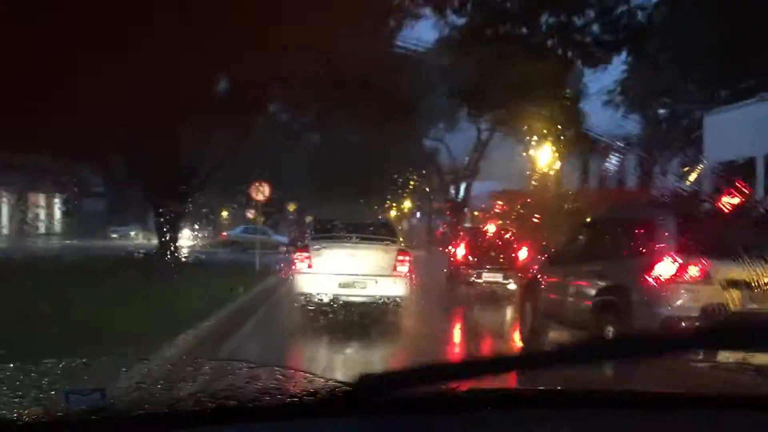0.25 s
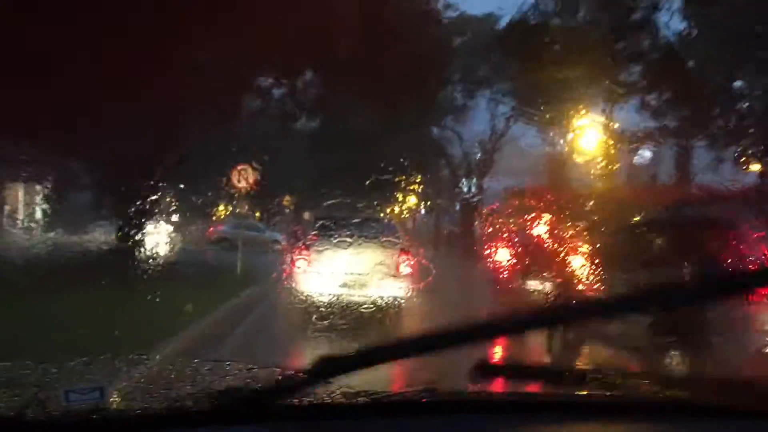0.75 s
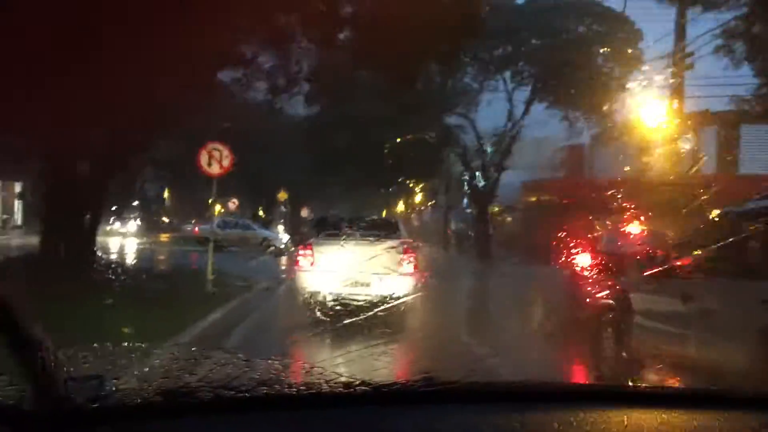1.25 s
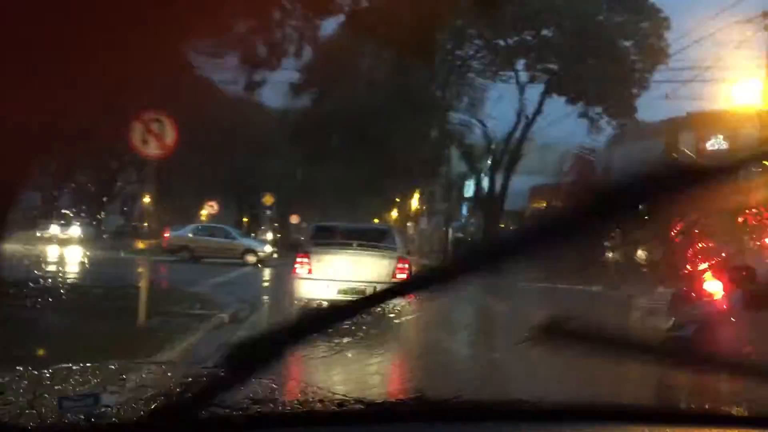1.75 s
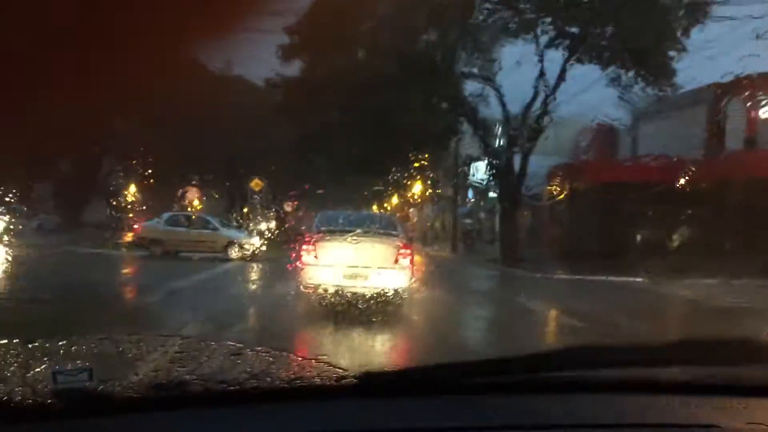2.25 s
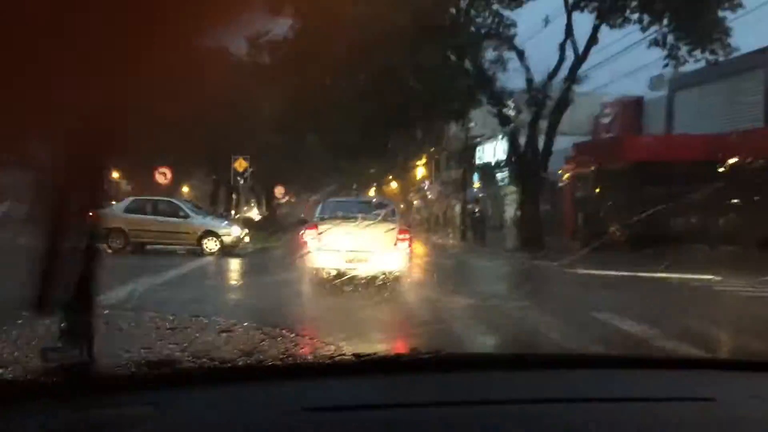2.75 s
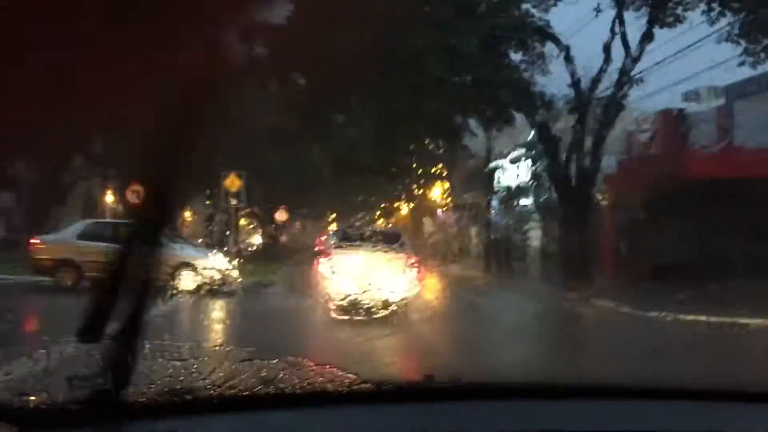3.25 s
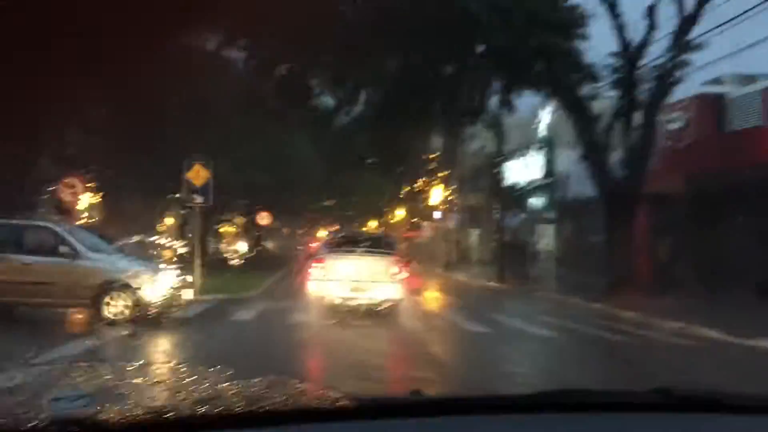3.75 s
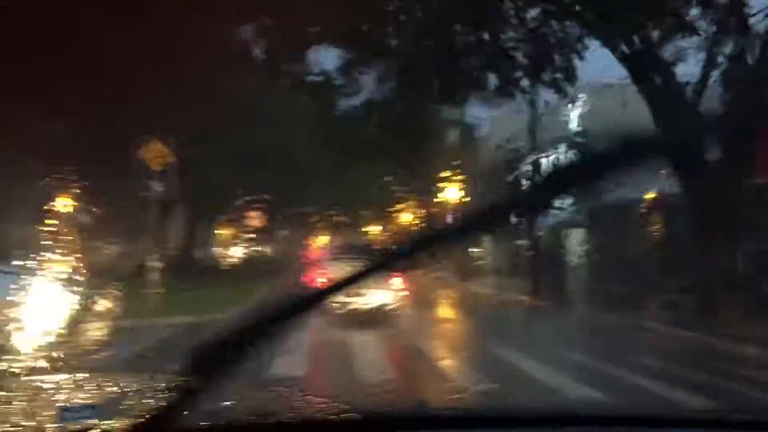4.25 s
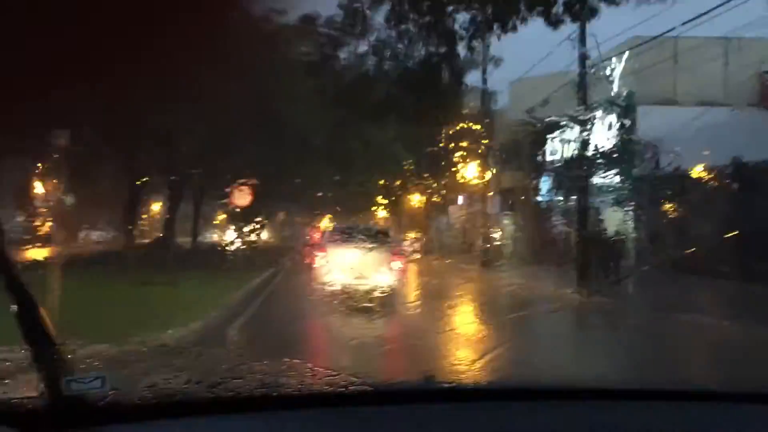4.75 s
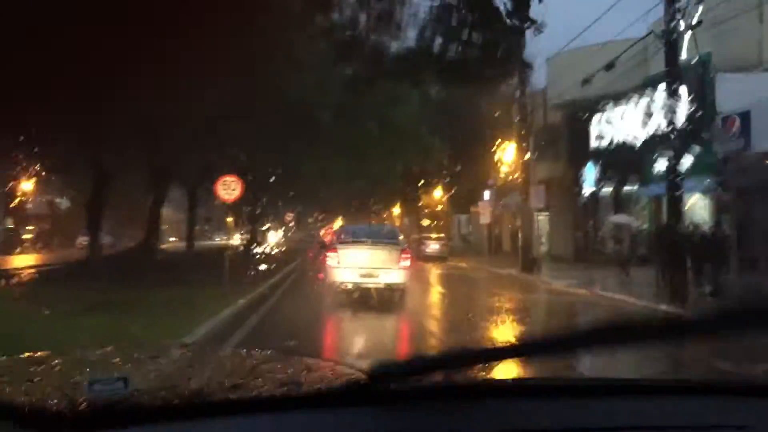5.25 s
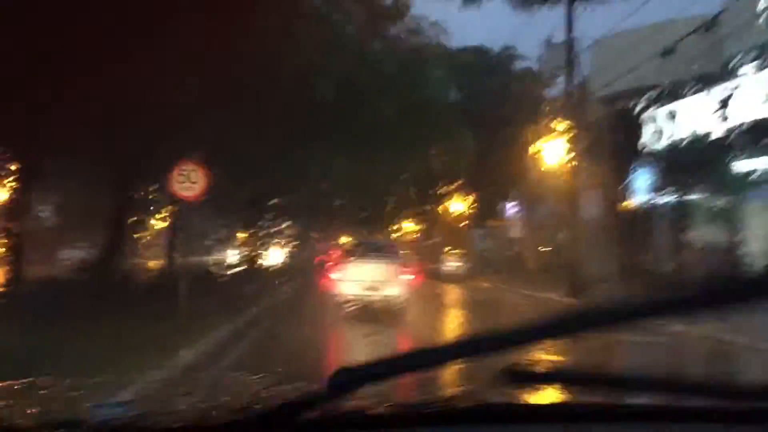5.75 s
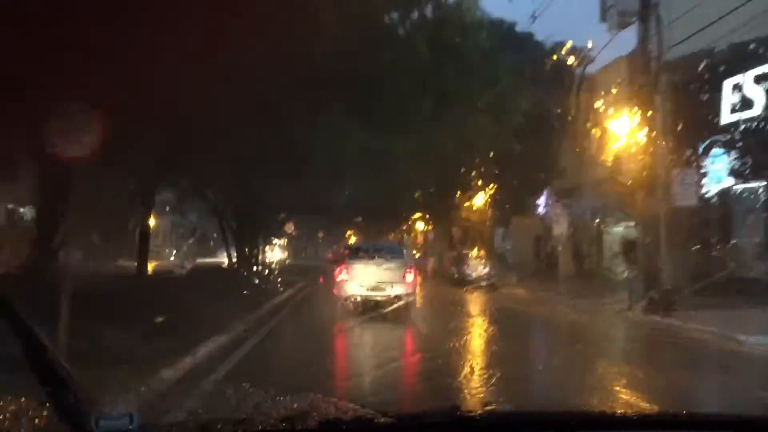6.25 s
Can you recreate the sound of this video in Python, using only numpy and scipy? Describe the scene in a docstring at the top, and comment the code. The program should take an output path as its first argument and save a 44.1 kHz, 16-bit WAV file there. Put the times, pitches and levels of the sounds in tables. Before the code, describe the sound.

Dense rain patter runs throughout, bright crackling on glass over a duller, slightly metallic roof drumming. A low uneven engine and road rumble fills the closed cabin. From just after half a second, wipers repeat about every 1.7 seconds: wet swish, raspy chattering rubber, low double thud. Fine spray and wet tyres add soft hiss, heard from a phone inside the car.

```python
"""Heavy rain heard from inside a slowly rolling car.
From the start drops tick on the windshield and drum on the lined roof: noise bursts through resonances.
Fine spray hisses, tyres hiss in standing water, and road noise and an engine tone boom in the cabin.
Soon the wipers join in, four times over: a wet swish, a juddering stroke of swinging rubber
that snags and rasps, then knocks as the blades flip over."""
import sys
import numpy as np
from scipy import signal
from scipy.fft import rfft, irfft
from scipy.io import wavfile

SR = 44100
rng = np.random.default_rng(int(sys.argv[2]) if len(sys.argv) > 2 else 0)


def file_out(sig):
    """Save sig as 16-bit WAV at sys.argv[1]."""
    # one column per channel
    cols = np.atleast_2d(sig).T
    # limit, then scale
    lim = np.clip(cols, -1, 1)
    pcm = np.round(lim * 32767).astype(np.int16)
    wavfile.write(sys.argv[1], SR, pcm)


N = 287091
T = np.arange(N) / SR

# strength of the shower before its brief lulls: [t/s, patter on the glass/dB, drumming on the roof/dB]
SHOWER = [(0, -50.5, -39.5), (0.3, -50, -42.5), (0.48, -53, -52.5), (0.6, -49, -41.5), (0.75, -60.5, -49.5),
          (1.05, -50, -40.5), (1.24, -66, -53), (1.35, -50.5, -36), (1.5, -56, -47.5), (1.75, -58, -40),
          (1.97, -53, -42.5), (2.2, -46.5, -39), (2.35, -58, -46.5), (2.45, -52.5, -48), (2.72, -53.5, -46),
          (2.87, -50, -45), (3.0, -57, -41.5), (3.14, -48.5, -51), (3.28, -66, -42), (3.39, -57, -46),
          (3.56, -51, -38), (3.7, -47.5, -43.5), (3.92, -64, -44.5), (4.3, -57.5, -47), (4.6, -51, -48),
          (4.92, -64, -52), (5.0, -45, -39.5), (5.1, -49.5, -44), (5.33, -47.5, -34.5), (5.42, -47.5, -40),
          (5.62, -49, -38), (5.95, -49, -51.5), (6.07, -55, -46), (6.2, -55, -41.5), (6.5, -52, -39)]
# dull answer of the pane to drops and wet slaps: [f/Hz, level/dB]
PANE_COLOUR = [(150, -3.5), (350, 5.5), (550, -4.5), (800, -8), (1300, -10), (2000, -10.5), (2600, -25.5),
               (5000, -39), (12000, -32)]
# low growl, shared by scraping rubber and the boom of the cabin: [f/Hz, level/dB]
GROWL_COLOUR = [(30, -37.5), (70, 1.5), (110, -4), (170, 1), (230, -2.5), (310, -3), (380, -23), (650, -29),
                (1400, -43), (5000, -64)]


def undb(db):
    """Decibels to gain."""
    return 10 ** (np.asarray(db) / 20)


def unit(x):
    """Scale to rms 1."""
    return x / np.sqrt(np.mean(x ** 2) + 1e-18)


def curve(rows, column=1):
    """One column of a table, joined by straight lines in time."""
    rows = np.array(rows)
    return np.interp(T, rows[:, 0], rows[:, column])


def add(track, s, sound):
    """Mix a sound into the track at time s."""
    i = int(np.clip(s * SR, 0, N - 1))
    track[i:i + len(sound)] += sound[:N - i]


def response(points, size=4096):
    """Causal (minimum-phase) impulse response of unit energy with the given colour."""
    hz, db = np.transpose(points)
    f = np.maximum(np.fft.rfftfreq(size, 1 / SR), 1)
    gain = undb(np.interp(np.log(f), np.log(hz), db))
    # folding the cepstrum onto positive times makes the response causal
    cepstrum = irfft(np.log(gain))
    cepstrum[1:size // 2] *= 2
    cepstrum[size // 2 + 1:] = 0
    h = irfft(np.exp(rfft(cepstrum)))
    return h / np.linalg.norm(h)


def colour(x, points):
    """Pass a sound through a body with the given colour."""
    return signal.oaconvolve(x, response(points))[:N]


def ring(x, modes):
    """Sum of resonances (Hz, width Hz, dB)."""
    out = 0
    for hz, width, db in modes:
        b, a = signal.iirpeak(hz, hz / width, fs=SR)
        out = out + undb(db) * signal.lfilter(b, a, x)
    return out


def walk(rate):
    """Slow random drift within -2 to 2, with rate knots per second and a spread near 1."""
    knots = 2 * np.tanh(rng.standard_normal(N))
    return np.interp(T * rate, np.arange(N), knots)


def splash(decay_s, grain_db=3, spot_db=2, size=5000):
    """A burst of scattering droplets, coloured by the spot it hits; rms 1 if packed into 10 ms."""
    t = T[:size]
    grain = np.interp(t * 900, np.arange(size), rng.standard_normal(size))
    droplets = undb(grain_db * grain)
    burst = rng.standard_normal(size) * droplets * np.exp(-t / decay_s)
    spot_hz = 700 * 10 ** rng.random(3)
    burst = burst + ring(burst, [(hz, hz / 5, spot_db) for hz in spot_hz])
    return burst * np.sqrt(SR / 100) / np.linalg.norm(burst)


def patter(rate, spread_db, crack_s, tail_s, tail_db, count=16):
    """Drops of all sizes fall at random on several spots, each spot with its own splash; rms 1."""
    out = 0
    for _ in range(count):
        falls = np.zeros(N)
        when, size = rng.random((int(rate * T[-1] / count), 2)).T
        falls[(when * N).astype(int)] = undb(-spread_db * size)
        drop = splash(crack_s) + undb(tail_db) * splash(tail_s)
        out = out + signal.oaconvolve(falls, drop)[:N]
    return unit(out)


def brighten(x, db):
    """Lift or dull the top against the rest by the given dB, with part of the change balanced out."""
    lowpass = signal.butter(2, 6600, fs=SR, output="sos")
    low = signal.sosfiltfilt(lowpass, x, padtype=None)
    return undb(-db / 4) * (low + undb(db) * (x - low))


def middling_drops():
    """Random drops, harder when the shower is strong: rows like those of the big drops."""
    per_s, spread_db = 18, 3
    when, size, spot, bright = rng.standard_normal((int(per_s * T[-1]), 4)).T
    s = np.clip((np.arange(len(when)) + .5 + .5 * when) / per_s, 0, T[-1])
    crack_db = np.interp(s, T, curve(SHOWER)) + spread_db * np.tanh(size)
    spatter_db = crack_db + 3
    pane_db = crack_db + spread_db * spot
    return list(zip(s, crack_db, spatter_db, pane_db, 2 * bright))


def windshield(lulls):
    """Drops crack on hard glass, scatter into spatter and draw a dull answer from the pane."""
    # biggest single drops, before brightening and colour:
    # [t/s, first crack level/dB, spatter level/dB, pane level/dB, top against the rest/dB]
    big_drops = [(0.0134, -42, -40, -35.5, -2), (0.0497, -46, -37, -35.5, -10), (0.0862, -48, -46, -55, 0),
                 (0.1009, -45, -39, -41, -2), (0.1398, -37.5, -50, -33.5, -8), (0.1447, -42, -39, -28, 3),
                 (0.2498, -42.5, -40, -41, 6), (0.3022, -47, -48, -38, 1), (0.3323, -42.5, -52, -47, -11),
                 (0.5898, -50, -47, -59, 5), (0.7657, -50, -45, -44, -4), (0.8049, -41.5, -42, -33, 3),
                 (0.903, -45, -39.5, -33.5, -10), (0.9168, -46, -42, -49, -1), (0.9294, -47, -46, -55, 8),
                 (1.0215, -45.5, -50, -54, 5), (1.0334, -50, -61, -51, 0), (1.0448, -46, -44, -36, -6),
                 (1.0547, -41, -51, -35.5, -1), (1.1134, -43, -43, -42, -7), (1.1182, -43, -54, -59, -2),
                 (1.1379, -43.5, -40, -42, -9), (1.152, -44, -40, -55, -3), (1.2217, -42, -44, -48, -14),
                 (1.2881, -39.5, -48, -35, -9), (1.341, -55, -48, -30.5, -6), (1.364, -41.5, -52, -31, -12),
                 (1.4275, -54, -46, -43, 0), (1.451, -45, -46, -54, -3), (1.4595, -38.5, -45, -40, -3),
                 (1.4927, -46, -57, -58, -12), (1.5272, -34.5, -36.5, -34, 0), (1.5466, -43, -47, -35, -6),
                 (1.6251, -40, -41, -37.5, -1), (1.6526, -40.5, -43, -35, -4), (1.7161, -48, -38, -53, -12),
                 (1.7232, -45, -39, -46, -6), (1.7875, -41.5, -39, -34, -20), (1.8188, -40, -34.5, -37, -3),
                 (1.8597, -45, -36, -30, -14), (1.8634, -42, -43, -39, -9), (1.8793, -49, -41, -39, 6),
                 (1.894, -48, -41, -33, -1), (1.942, -53, -47, -25, 2), (1.9719, -43.5, -47, -53, -15),
                 (1.9852, -50, -43, -37, -12), (1.9952, -52, -42, -45, -6), (2.0076, -43, -44, -53, -6),
                 (2.0288, -50, -43, -36, -10), (2.0554, -48, -44, -37, -7), (2.1124, -44.5, -48, -56, -1),
                 (2.1503, -44, -41, -28, -7), (2.2048, -49, -38, -53, 1), (2.5344, -54, -42, -45, 4),
                 (2.5759, -40.5, -44, -36.5, -5), (2.6508, -45, -42, -39, 1), (2.6595, -49, -48, -47, 0),
                 (2.715, -47, -39.5, -33, -4), (2.7493, -46, -44.5, -46, -3), (2.8192, -49, -44, -41, -2),
                 (2.8615, -46.5, -50, -40, 10), (2.9175, -45, -41, -37, -6), (2.956, -44, -45, -41, -16),
                 (2.9737, -52, -41, -37, -8), (3.065, -46.5, -51, -32, 4), (3.1816, -47, -44, -41, -6),
                 (3.1867, -49, -43, -40, -4), (3.1938, -39.5, -43.5, -50, -8), (3.1984, -40, -45, -45, 3),
                 (3.2324, -47, -42, -55, 6), (3.2707, -43, -46, -43, -10), (3.2828, -54, -42.5, -38, -14),
                 (3.3299, -40.5, -36.5, -35, -1), (3.3978, -42, -39, -54, -2), (3.4076, -40, -46, -52, -5),
                 (3.4254, -41.5, -38, -42, -2), (3.4615, -41, -43, -38, -4), (3.5001, -44, -41.5, -35, -5),
                 (3.5302, -48, -41, -33.5, -3), (3.5464, -46, -48, -56, -4), (3.6715, -45, -47, -35, -13),
                 (3.6837, -42.5, -44, -50, -5), (3.7502, -59, -44, -33, -2), (3.8538, -55, -43, -37, 5),
                 (3.9573, -54, -56, -31, -2), (4.0636, -49, -56, -52, 2), (4.1006, -49, -40.5, -31, 0),
                 (4.2248, -54, -50, -42, 4), (4.2368, -47.5, -59, -38, 5), (4.2604, -55, -63, -43, 0),
                 (4.2709, -55, -58, -62, 11), (4.3604, -50, -62, -63, 0), (4.4792, -51, -47, -60, 0),
                 (4.7476, -53, -43, -38, -6), (4.8276, -40, -41, -54, -5), (4.8948, -53, -46, -42, -6),
                 (4.9236, -50, -42, -54, -11), (4.9482, -49, -52, -59, 1), (4.9776, -47, -47, -29.5, -10),
                 (5.0013, -45, -38.5, -31.5, -4), (5.0288, -46.5, -42, -42, 5), (5.0499, -46, -47, -41, 0),
                 (5.0868, -41, -44, -32.5, -5), (5.0956, -44, -47, -44, -4), (5.1436, -52, -45, -39, 1),
                 (5.1789, -49, -44, -56, -5), (5.1939, -55, -45, -54, 6), (5.197, -39, -49, -54, 3),
                 (5.2211, -48, -47, -40, 4), (5.2444, -37.5, -33.5, -37, -1), (5.2776, -49, -44, -34.5, 6),
                 (5.3225, -52, -37.5, -52, 5), (5.3385, -41, -35, -30, 4), (5.348, -47, -37, -32, -2),
                 (5.3646, -49, -39, -33, -4), (5.3682, -51, -50, -48, -5), (5.3805, -47, -45, -33.5, 2),
                 (5.4009, -48, -42, -39, -4), (5.4116, -46, -47, -55, -5), (5.4579, -41, -55, -34, -7),
                 (5.4613, -38.5, -42, -33, -2), (5.4841, -43, -44, -36, -4), (5.5242, -51, -39, -56, 4),
                 (5.5799, -43, -58, -55, -4), (5.5867, -46, -37, -52, -3), (5.6238, -42, -50, -29.5, -10),
                 (5.6453, -43, -45, -35, -10), (5.6657, -47, -57, -44, -12), (5.6906, -45, -57, -30.5, -19),
                 (5.7424, -43, -41, -53, -3), (5.7641, -45, -38, -52, 0), (5.8143, -48, -47, -34, -3),
                 (5.8833, -46, -45, -56, 2), (5.8979, -39.5, -41, -51, -3), (5.9985, -42, -46, -33, 1),
                 (6.0487, -43.5, -44, -56, 10), (6.0852, -44.5, -43, -38.5, 7), (6.1, -39, -36.5, -33, 5),
                 (6.1398, -46, -41, -54, 6), (6.1734, -48, -46, -52, -9), (6.1871, -55, -37.5, -51, 0),
                 (6.213, -40.5, -35.5, -38, 2), (6.2491, -46, -43, -36, 0), (6.2689, -37, -36, -37, 1.5),
                 (6.2733, -45, -39, -43, 0), (6.2988, -37.5, -45, -51, -6), (6.3171, -43, -42, -36, -5),
                 (6.3973, -47, -41.5, -41, 4), (6.4749, -48, -41.5, -36, -1)]
    # first crack on the glass: [f/Hz, level/dB]
    crack_colour = [(400, -6), (1200, 1), (2200, 1.5), (3600, 1.5), (4900, -1.5), (5700, 1), (7500, -3.5),
                    (9500, -3.5), (10500, -11), (11500, -6.5), (15500, -9.5)]
    # ticking of spatter and small drops: [f/Hz, level/dB]
    tick_colour = [(400, 0), (1200, 2.5), (2200, 1.5), (3600, 4), (4900, -0.5), (5700, 1.5), (7500, -5),
                   (9500, -8), (10500, -14), (11500, -13.5), (15500, -18.5)]
    small = patter(rate=100, spread_db=18, crack_s=.0005, tail_s=.005, tail_db=-1)
    small = small * undb(curve(SHOWER)) * lulls
    cracks, spatter, pane = np.zeros((3, N))
    for s, crack_db, spatter_db, pane_db, bright_db in list(big_drops) + middling_drops():
        crack = brighten(splash(decay_s=0.00045, spot_db=-4), bright_db)
        add(cracks, s, undb(crack_db + 1.5) * crack)  # hard glass favours the crack
        droplets = brighten(splash(decay_s=0.0045, grain_db=4, spot_db=-3), bright_db)
        add(spatter, s + 0.0013, undb(spatter_db) * droplets)
        add(pane, s, undb(pane_db) * splash(decay_s=0.0065, grain_db=2, spot_db=-5))
    ticks = colour(cracks, crack_colour) + colour(spatter + small, tick_colour)
    return ticks + colour(pane + undb(-1) * small, PANE_COLOUR)


def roof(lulls):
    """Drops drum on ringing sheet steel, heavy splats ring their spot, and the lining takes off treble."""
    # heaviest splats, before the roof's colour: [t/s, level/dB, ring of the spot f/Hz]
    splats = [(0.038, -31, 1000), (0.111, -37, 940), (0.149, -35, 720), (0.247, -31.5, 1110),
              (0.273, -37, 1770), (0.415, -39, 1090), (0.545, -36, 1350), (1.309, -33, 1200),
              (1.345, -32, 1300), (1.858, -26, 1910), (1.924, -27.5, 1155), (1.984, -32.5, 1340),
              (2.044, -30.5, 1090), (2.132, -29.5, 1170), (2.25, -33.5, 1180), (2.348, -34, 1100),
              (2.917, -30, 1140), (2.975, -31.5, 1170), (3.016, -30.5, 1080), (3.045, -30, 1370),
              (3.503, -37.5, 950), (3.574, -31.5, 1220), (3.621, -37.5, 1290), (3.752, -34, 1110),
              (5.21, -33.5, 1410), (5.261, -29, 1100), (5.54, -43, 1240), (5.81, -35, 990),
              (5.91, -31.5, 970), (5.963, -31, 1180), (6.395, -40, 1310), (6.456, -32, 1070),
              (6.478, -31, 1350)]
    # lined roof: [f/Hz, level/dB]
    roof_colour = [(100, -7), (220, 4.5), (420, 6.5), (540, 0.5), (780, -7.5), (980, 3), (1400, -5),
                   (2000, -4.5), (2700, -10.5), (5000, -20), (12000, -76)]
    # resonances of the steel sheet: [f/Hz, width/Hz, level/dB]
    sheet_modes = [(668, 51, 20), (1107.5, 11, 16.5), (1350, 30, 13), (1740, 240, 2.5)]
    drumming = patter(rate=220, spread_db=11, crack_s=0.0019, tail_s=0.009, tail_db=2.5)
    blows = drumming * undb(curve(SHOWER, column=2)) * lulls
    for s, db, hz in splats:
        splat = splash(decay_s=0.021, grain_db=5, spot_db=-4)
        spot_ring = ring(splat, [(hz, 320, 0)])
        add(blows, s, undb(db) * (undb(-4) * splat + spot_ring))
    sheet = colour(blows, roof_colour)
    return sheet + undb(-9.5) * ring(sheet, sheet_modes)


def spray(lulls):
    """Countless fine drops merge into a soft hiss that swells at random and partly follows the shower."""
    # soft hiss of spray: [f/Hz, level/dB]
    spray_colour = [(150, -18), (350, 10), (700, -1), (1200, 1.5), (2500, -11.5), (4000, -7), (5800, -10),
                    (7500, -12.5), (9600, -15), (10500, -27), (11500, -16), (15500, -38)]
    fine = patter(rate=2200, spread_db=20, crack_s=0.0004, tail_s=0.002, tail_db=0)
    shower_db = curve(SHOWER) - np.mean(curve(SHOWER))
    swell_db = 1.2 * walk(rate=6.6)
    hiss_db = -48.3 + 0.13 * shower_db + swell_db
    return colour(fine * lulls * undb(hiss_db), spray_colour)


def tyres():
    """Where water stands on the road the tyres hiss evenly: coloured noise that comes and goes."""
    # strength of the hiss, applied after its colour: [t/s, level/dB]
    standing_water = [(0, -47), (2.2, -59), (2.5, -44.5), (2.72, -65), (3.8, -47.5), (4.25, -47.5),
                      (4.6, -47), (4.77, -45.5), (4.88, -55), (5.0, -60), (6.5, -55)]
    # smooth hiss of tyres in water: [f/Hz, level/dB]
    hiss_colour = [(400, 6), (1200, 11), (4000, 1), (6000, -0.5), (9000, -7.5), (12000, -11), (15500, -12)]
    return colour(rng.standard_normal(N), hiss_colour) * undb(curve(standing_water))


def road():
    """Uneven asphalt shakes the body; with the engine it keeps the cabin air booming."""
    # road rumble before the patches of asphalt sway it: [t/s, level/dB]
    rumble_level = [(0, -26.5), (0.4, -36), (1.05, -35.5), (1.9, -37), (2.7, -27), (3.8, -37.5),
                    (5.15, -35), (6.2, -33.5), (6.5, -31)]
    # rumble of the body: [f/Hz, level/dB]
    rumble_colour = [(15, -44), (28, -10), (43, 5.5), (70, 5.5), (90, -1.5), (140, -1.5), (250, -18.5),
                     (500, -29.5), (2000, -71)]
    # resonances of the cabin air: [f/Hz, width/Hz, level/dB]
    cabin_modes = [(102, 30, 0), (172, 8.6, -5), (331.6, 55, -12)]
    # how hard the engine pulls, on boom and engine tone alike: [t/s, level/dB]
    throttle = [(0, -3.5), (2.6, -1), (4.5, 1), (5.1, -3.5), (5.8, 2), (6.5, -0.5)]
    # patches in the asphalt make everything here come and go
    bumps = undb(1.5 * walk(rate=7))
    rumble = unit(colour(rng.standard_normal(N), rumble_colour)) * undb(curve(rumble_level))
    growl = colour(rng.standard_normal(N), GROWL_COLOUR)
    boom = unit(ring(growl, cabin_modes)) * undb(-32.5)
    engine_hz = 105 * (1 + 0.0443 * walk(rate=9.7))
    engine_tone = np.sin(2 * np.pi * np.cumsum(engine_hz) / SR)
    engine = engine_tone * undb(-34 + 2 * walk(rate=4.8))
    return (rumble + (boom + engine) * undb(curve(throttle))) * bumps


def flap(hz, cycles, overtone, size=6000):
    """A blade snaps free, swings to its peak after some cycles and dies away, with a weaker overtone."""
    turns = T[:size] * hz
    swing = np.sin(2 * np.pi * turns) + overtone * np.sin(2 * np.pi * 1.93 * turns)
    envelope = (turns / cycles * np.exp(1 - turns / cycles)) ** 2
    return swing * envelope


def stroke(start, bite_s):
    """Rubber sticks and slips with a rasp; as the blade slows its growl sinks and the rasp fades."""
    # blade speed at the start and end of a stroke: [speed (1 = nominal)]
    blade_speed = [1.35, 0.65]
    # rasp of each slip: [f/Hz, level/dB]
    rasp_colour = [(200, -16), (330, 5.5), (540, 4.5), (680, -3), (900, -13), (2000, -28), (6000, -47)]
    judder_hz, slips_per_s = 112, 34  # pitch at nominal speed; mean rate of slips
    end = start + 0.73
    speed = np.interp(T, [start, end], blade_speed)
    judder, grit = np.zeros((2, N))
    for k, (early, detune, size) in enumerate(rng.standard_normal((60, 3))):
        s = start + (k + 0.27 * early) / slips_per_s
        hz = judder_hz * np.interp(s, T, speed) * np.exp(0.089 * detune)
        add(judder, s, undb(3.2 * size) * flap(hz, cycles=1.12, overtone=0.32))
        add(grit, s, undb(2.4 * size) * splash(decay_s=0.011))
    rasp_db = -22 + 28 * (speed - 1)
    rasp = colour(grit, rasp_colour) * undb(rasp_db)
    # the grain of the glass passes under the blade at the blade's speed
    grain = unit(colour(rng.standard_normal(N), GROWL_COLOUR))
    scrape = np.interp(np.cumsum(speed), np.arange(N), grain, period=N)
    # the rubber bites, holds, then eases off to a share of its grip before it lets go
    hold = np.clip(np.minimum(T - start, end - T) / bite_s, 0, 1)
    grip = hold * np.interp(T, [end - 0.069, end], [1, 0.16])
    return (undb(-1) * judder + undb(-11) * scrape + rasp) * grip


def wipers():
    """Each cycle: a wet swish, a rubbing stroke with snags, then flip-over knocks that shake the cowl."""
    # gain of each rubbing stroke: [level/dB]
    stroke_levels = [-23, -25, -25, -23.5]
    # the rubber snags hard and chatters: [t/s, level/dB, pitch f/Hz, swings to the peak, overtone share]
    snags = [(0.632, -17, 144, 0.51, 0.4), (0.666, -17, 136.0, 1.3, 0.1), (0.7, -17.0, 142, 1.1, 0.2),
             (0.731, -17.5, 149, 1.43, 0.3), (0.76, -20, 120.6, 1.9, 0.3), (0.81, -17.5, 133.6, 1.6, 0.3),
             (0.857, -23, 115, 2.4, 0.1), (0.953, -17.5, 137, 1.06, 0.4), (0.996, -26, 106, 1.6, 0.2),
             (1.061, -22, 98, 0.7, 0.2), (1.089, -20, 134, 1.3, 0.2), (1.142, -27, 84, 1.1, 0.1),
             (1.166, -23.5, 143.0, 2.4, 0.3), (1.228, -20, 111.0, 0.91, 0.1),
             (2.349, -16.0, 146.7, 2.06, 0.2), (2.423, -23, 118.0, 1.7, 0.2),
             (2.451, -18.0, 117, 0.78, 0.1), (2.473, -11.5, 138, 0.82, 0.3),
             (2.499, -22, 135.0, 0.86, 0.11), (2.503, -22, 187, 1.7, 0.1), (2.575, -15.5, 115, 0.66, 0.2),
             (2.603, -24, 107, 0.74, 0.1), (2.624, -18.5, 123.5, 1.8, 0.2), (2.694, -22, 130, 0.82, 0.2),
             (2.722, -20, 90.0, 1.2, 0.1), (2.754, -22, 154.0, 0.98, 0.2), (2.776, -19, 117.0, 1.1, 0.1),
             (2.858, -20, 94.0, 1.2, 0.1), (2.934, -22, 97.0, 1.0, 0.1), (3.981, -20.0, 138, 0.96, 0.2),
             (4.018, -20, 107, 1.2, 0.4), (4.03, -26.5, 372, 3, 0.09), (4.055, -20, 109.5, 1.4, 0.1),
             (4.1, -26.0, 287, 2.6, 0.1), (4.122, -21, 132.0, 2.3, 0.3), (4.157, -21, 117, 1.7, 0.4),
             (4.223, -15.5, 148, 0.72, 0.2), (4.238, -17.5, 113, 1.6, 0.1), (4.286, -19.0, 127.0, 1.2, 0.1),
             (4.324, -20, 130, 1.2, 0.2), (4.343, -27, 111.5, 3.4, 0.1), (4.431, -17.0, 124.0, 0.91, 0.2),
             (4.523, -14.5, 114, 1.1, 0.2), (4.567, -21, 97, 0.68, 0.1), (4.58, -24, 91, 1.7, 0.1),
             (5.614, -19, 169, 1.7, 0.2), (5.656, -24, 150.0, 0.92, 0.3), (5.681, -15, 151.4, 2.2, 0.2),
             (5.738, -22, 160, 1, 0.4), (5.791, -18.5, 118.0, 2.4, 0.4), (5.803, -23.5, 360, 2.4, 0.1),
             (5.845, -14, 118.0, 0.81, 0.3), (5.877, -14.5, 111.7, 2.4, 0.1), (5.912, -23.5, 223, 2.0, 0.2),
             (5.993, -25, 113.0, 1.2, 0.2), (6.006, -14, 235, 1.45, 0.067), (6.061, -23, 144.0, 1.4, 0.2),
             (6.089, -18.5, 90, 1, 0.1), (6.134, -24, 113.5, 2, 0.2), (6.233, -16.5, 86, 1.7, 0.1)]
    # the blades knock as they flip over: [t/s, level/dB, pitch f/Hz, overtone share]
    flip_knocks = [(1.418, -13.5, 139, 0.46), (1.4396, -12.5, 118, 0.1), (3.07, -18.5, 170, .1),
                   (3.0884, -14.5, 130, 0.47), (3.1072, -13.5, 114, 0.13), (4.7503, -10, 134, 0.33),
                   (4.7715, -14, 125, 0.079), (6.435, -18, 134, 0.47)]
    # the cowl that carries the wipers rings after a knock: [f/Hz, width/Hz, level/dB]
    cowl_modes = [(69.6, 5.9, -4)]
    first_s, period_s, bite_s = 0.595, 1.666, 0.02
    rubbing, wet, knocks = np.zeros((3, N))
    for k, rub_db in enumerate(stroke_levels):
        start = first_s + k * period_s
        swish = splash(decay_s=0.11, spot_db=-17, size=9000)
        add(wet, start + bite_s, undb(-36) * swish)
        rubbing += undb(rub_db) * stroke(start, bite_s)
    for s, db, hz, swings, overtone in snags:
        add(rubbing, s, undb(db) * flap(hz, swings, overtone))
    for s, db, hz, overtone in flip_knocks:
        add(knocks, s, undb(db) * flap(hz, 0.83, overtone))
        add(wet, s, undb(db - 28) * splash(decay_s=0.015))  # slap on the pane
    return rubbing + knocks + ring(knocks, cowl_modes) + colour(wet, PANE_COLOUR)


def scene():
    """Everything meets at one microphone behind the windshield."""
    # heavy rain comes unevenly, with brief lulls; light rain is more even
    lull_db = np.interp(curve(SHOWER), [-54.5, -50.5], [1.4, 2.8])
    lulls = undb(lull_db * np.minimum(walk(rate=44), 0))
    rain = windshield(lulls) + roof(lulls) + spray(lulls)
    return (rain + tyres() + road() + wipers())[None]


def record(dry):
    """The phone cuts the top: a steep low-pass at 15150 Hz."""
    lowpass = signal.ellip(8, .2, 70, 15150, fs=SR, output="sos")
    return signal.sosfilt(lowpass, dry)


dry = scene()
out = record(dry)
file_out(out)
```